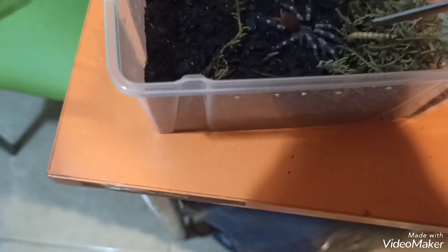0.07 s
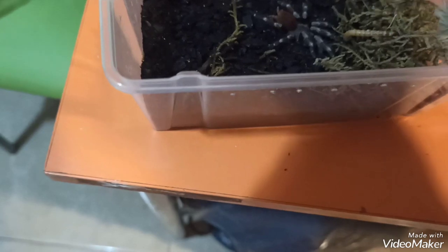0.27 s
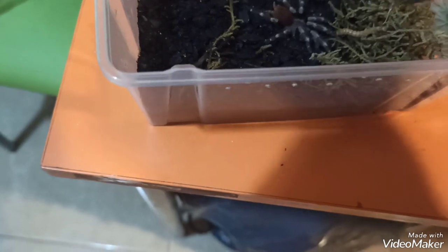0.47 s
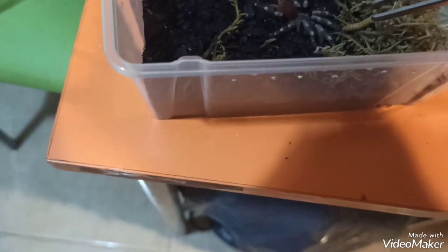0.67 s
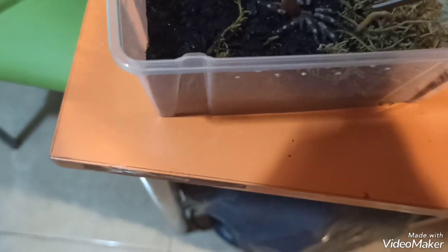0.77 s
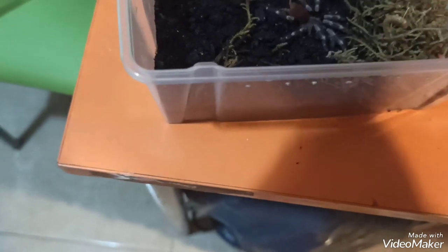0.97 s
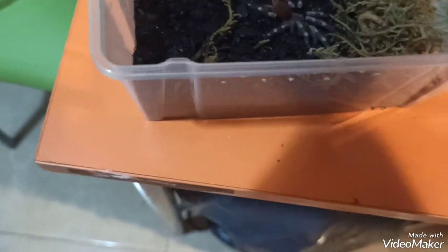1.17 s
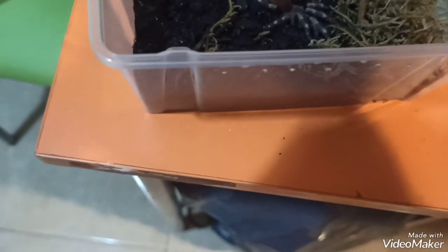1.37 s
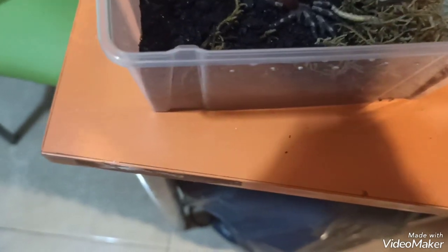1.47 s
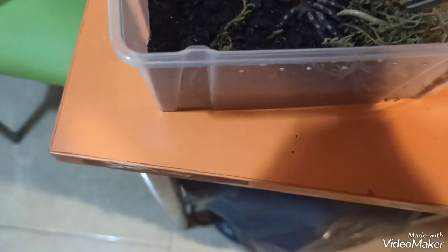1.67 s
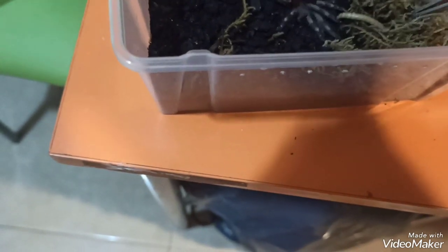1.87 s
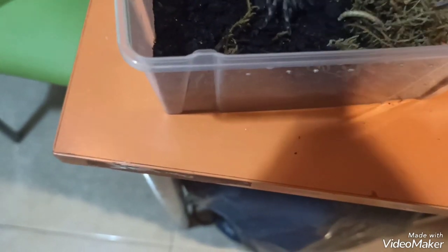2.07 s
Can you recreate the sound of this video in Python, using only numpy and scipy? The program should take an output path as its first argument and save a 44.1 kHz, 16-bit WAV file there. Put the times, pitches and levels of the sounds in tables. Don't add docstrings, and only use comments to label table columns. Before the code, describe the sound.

Steel feeding tweezers knock a thin plastic tub near the end, rattling and bouncing once. Before that, only faint metallic ticks and soft table thumps over distant machine rumble and hiss, heard close in a hard room.

```python
import sys
import numpy as np
from scipy import signal
from scipy.fft import rfft, irfft, next_fast_len
from scipy.io import wavfile
from scipy.ndimage import uniform_filter1d

SR = 44100
rng = np.random.default_rng(int(sys.argv[2]) if len(sys.argv) > 2 else 0)


def master_out(mix):
    frames = np.transpose(np.atleast_2d(mix))
    ceiling = np.clip(frames, -1, 1)
    pcm = np.round(ceiling * 32767).astype(np.int16)
    wavfile.write(sys.argv[1], SR, pcm)


def linear_from_db(decibels):
    return 10 ** (np.asarray(decibels, float) / 20)


N = 93844

# start in seconds, strength in dB, brightness in dB per octave.
KNOCKS = [(1.8919, -2.5, 1), (1.9531, -8, 0.5), (1.9033, -19.5, -.8), (1.912, -11.5, -8.5),
          (1.9155, -18.5, -2), (1.9188, -41, 9), (1.9569, -21.5, 1.5), (1.972, -24.5, -11.5),
          (2.003, -25, -2.5), (2.0075, -25.5, -2), (2.0385, -30, -3)]


def unit(x):
    return x / np.sqrt(np.mean(x ** 2) + 1e-20)


def along(points, hz):
    f, v = np.transpose(points)
    return np.interp(np.log(hz + 1), np.log(f + 1), v)


def filtered(x, response):
    m = next_fast_len(N + SR // 2)
    return irfft(rfft(x, m) * response(np.fft.rfftfreq(m, 1 / SR)), m)[..., :N]


def ring(start_s, hz, db, t60, rise_cycles, lag_s=0, side=1):
    t = np.arange(N) / SR - start_s
    keep = (t > 0) & (t < .2)
    t = np.clip(t[keep, None] - lag_s, 0, None)
    decay = side * linear_from_db(db - 60 * t / t60)
    rise = 1 - np.exp(-t * hz / rise_cycles)
    out = np.zeros(N)
    out[keep] = (decay * rise * np.sin(2 * np.pi * hz * t)).sum(axis=1)
    return out


def rush(gain, patchy_db):
    z = signal.stft(rng.standard_normal(N), nperseg=1024)[2]
    field = uniform_filter1d(rng.standard_normal(z.shape), size=4, axis=0)
    field = uniform_filter1d(field, size=5, axis=1)
    noise = signal.istft(z * linear_from_db(patchy_db * unit(field)), nperseg=1024)[1][:N]
    return unit(filtered(noise, gain))


def follow(rows):
    s, db = np.transpose(rows)
    return linear_from_db(np.interp(np.arange(N) / SR, s, db))


def fuzzy(hz, wide_hz):
    return rush(lambda f: 1 / (1 + ((f - hz) / wide_hz) ** 2), patchy_db=1.0)


def air():
    # frequency in Hz, density in dB per Hz.
    rumble_color = [(25, -15), (54, -10.5), (85, 5), (280, -0.5), (450, -9), (620, -11.5), (1000, -19.5),
                    (2000, -37.5)]
    hiss_color = [(300, 11), (1500, 3.5), (2800, -1.5), (4100, 0), (6000, -3.5), (6750, -3), (7200, -4),
                  (16000, -9.5)]
    # time in seconds, level in dB.
    swell = [(0.0, -48), (0.04, -48), (0.102, -50.5), (0.29, -50), (0.316, -55.5), (0.366, -49.5),
             (0.392, -50.5), (0.652, -49.5), (1.144, -50), (1.216, -50), (1.46, -52), (1.492, -50.5),
             (1.682, -49), (1.86, -49)]
    whine_level = [(0, -105), (.85, -69), (1.08, -56.5), (1.25, -64.5), (1.4, -59), (1.6, -71.5),
                   (2.13, -58)]
    drone_level = [(0, -63.5), (.25, -54), (.5, -64.5), (1.05, -65), (1.2, -53), (1.4, -57.5), (1.7, -55.5),
                   (1.82, -54), (2.13, -63)]
    whine = follow(whine_level) * fuzzy(605, wide_hz=25)
    drone = follow(drone_level) * fuzzy(244.5, wide_hz=12)
    rumble = rush(lambda f: linear_from_db(along(rumble_color, f)) * (f < 3000), patchy_db=1.4)
    hiss = rush(lambda f: linear_from_db(along(hiss_color, f)) * (f > 200), patchy_db=1.4)
    return linear_from_db(0.45) * follow(swell) * rumble + whine + drone + linear_from_db(-55.5) * hiss


def table():
    # start in seconds, level in dB, frequency in Hz.
    thumps = [
        (0.068, -57, 180),
        (.0408, -43, 790),
        (.04, -40, 87),
        (0.91, -39.5, 104),
        (1.215, -39, 140),
        (1.273, -44, 1030),
        (1.897, -34, 75),
        (1.965, -33, 143.3),
        (1.655, -50, 330),
    ]
    decay_cycles = 7.9
    return sum(ring(s, hz, db, decay_cycles / hz * 2, 0.2) for s, db, hz in thumps)


def tips():
    # start in seconds, level in dB, low ring over high in dB.
    ticks = [
        (0.3894, -44.5, 8),
        (1.2805, -50.5, 3),
        (1.335, -47, -10),
        (1.3385, -48, -10),
        (1.527, -60, -6),
        (1.791, -54, 1),
        (1.9673, -50, -13),
    ]
    # frequency in Hz, t60 in seconds.
    modes = [(6740, 0.013), (4900, 0.0032), (7800, 0.0064), (9700, 0.0043), (13900, 0.0036)]
    hz, t60 = np.transpose(modes)
    out = np.zeros(N)
    for s, db, low in ticks:
        balance_db = np.array([0, low, 3.5, 4 - 0.48 * low, -3])
        out += ring(s, hz, db + balance_db, t60, 0.79)
    return out


def room(x):
    # frequency in Hz, t60 in seconds.
    decay = [(200, 0.69), (1000, 0.57), (4000, 0.63), (10000, 0.33)]
    # frequency in Hz, level in dB.
    color = [(150, 12.5), (400, 20.5), (1000, 15), (2500, 3.5), (4500, -0.5), (6500, 6), (9800, -8.5),
             (15000, -16)]
    gap_s = 0.0053
    hz, t, z = signal.stft(rng.standard_normal(SR // 3), SR, nperseg=256)
    fade = linear_from_db(-60 * t / along(decay, hz)[:, None])
    tail = signal.istft(z * fade, SR, nperseg=256)[1]
    tail = np.pad(tail / np.linalg.norm(tail), (round(gap_s * SR), 0))
    return filtered(signal.fftconvolve(x, tail)[:N], lambda f: linear_from_db(along(color, f)))


def tub():
    # frequency in Hz, level at the first spot in dB, level at the bounce spot in dB, t60 in seconds.
    modes = [(383.6, -4.5, -3.5, 0.037), (630, -8.5, -14, 0.022), (960, -7, -3.5, 0.017),
             (1463, -4.5, -2, .014), (1910, -8, -10.5, 0.0064), (2480, -10, -7, 0.0048),
             (3664, -3, -10, 0.0046), (4740, -0.5, -7.5, 0.0032), (5250, -11, -20, .005),
             (6340, -4.5, -24, 0.0042), (7080, -2, -7.5, 0.0036), (7670, -1.5, -16, 0.0035),
             (11900, -17, -40, 0.0024), (15400, -22, -37, .002)]
    sides = [
        [1, -1, -1, -1, 1, 1, 1, -1, -1, -1, 1, -1, 1, -1],
        [1, 1, 1, 1, 1, -1, 1, -1, 1, -1, 1, -1, 1, -1],
    ]
    steel_hz, wall_lag_s = 5000, 0.000634
    pivot_hz = 576
    scatter_db, shift_part = 5, 0.11
    hz, first_db, bounce_db, t60 = np.transpose(modes)
    luck = rng.standard_normal((len(KNOCKS), 2, len(hz)))
    luck[:2] = 0
    spots = np.vstack([first_db, bounce_db + scatter_db * luck[1:, 0]])
    lag_s = wall_lag_s * (hz < steel_hz)
    knocks = []
    for (s, strength, tilt), spot_db, shift in zip(KNOCKS, spots, luck[:, 1]):
        db = strength + spot_db + tilt * np.log2(hz / pivot_hz)
        side = np.array(sides[int(s > KNOCKS[0][0])])
        knocks.append(ring(s, hz * (1 + shift_part * shift), db, t60, 0.76, lag_s, side))
    return knocks


def scene():
    background = air() + table()
    ticks, knocks = tips(), tub()
    wet = room(linear_from_db(-11) * ticks)
    for (s, db, _), knock in zip(KNOCKS[:2], knocks):
        blow = linear_from_db(db) * (np.arange(N) == round(s * SR))
        wet = wet + room(blow + linear_from_db(-36) * knock)
    quiet = sum(knocks[1:]) + ticks + wet + background
    return (knocks[0] + filtered(quiet, lambda f: f < 15850))[None]


def band_limit(x):
    return signal.sosfilt(signal.butter(12, 17660, fs=SR, output="sos"), x)


def record(dry):
    # band edge in Hz, gain step above it in dB.
    steps = [(4760, -6.5), (6110, 8), (6880, -2.5), (7660, -5.5), (8560, -6.5), (11560, 12), (12950, 6)]
    frame_s, ceiling, top_hz = .0165, .86, 16600
    f, half = np.fft.rfftfreq(SR, 1 / SR), round(frame_s * SR)
    band_gain = linear_from_db(sum(db * (f > hz) for hz, db in steps))
    kernel = np.roll(irfft(band_gain), half)[:2 * half + 1]
    x = filtered(dry, lambda hz: (1j * hz / (58 + 1j * hz)) ** 2)
    x = signal.fftconvolve(x, kernel[None], mode="same", axes=1)
    x = x / (1 + np.abs(x / ceiling) ** 4) ** .25
    lowpass = signal.firwin(127, top_hz, fs=SR)
    x = signal.fftconvolve(x, lowpass[None], mode="same", axes=1)
    return band_limit(x)


dry = scene()
out = record(dry)
master_out(out)
```